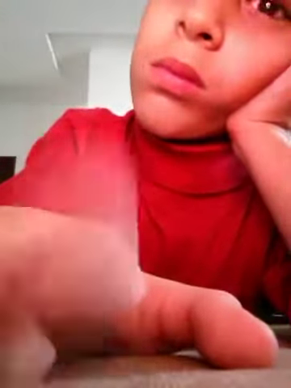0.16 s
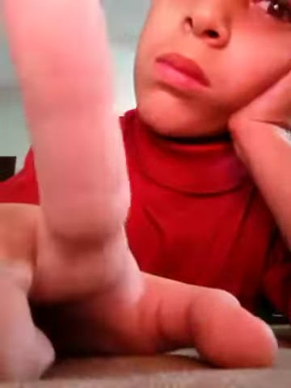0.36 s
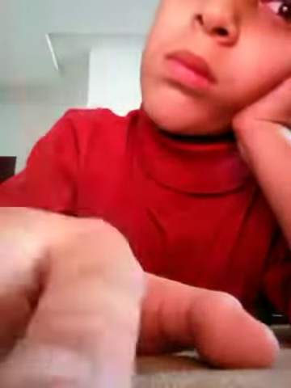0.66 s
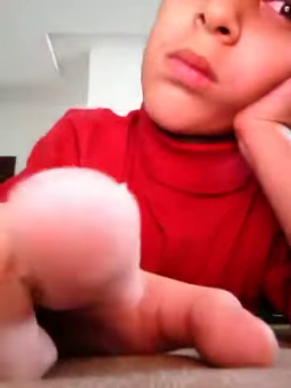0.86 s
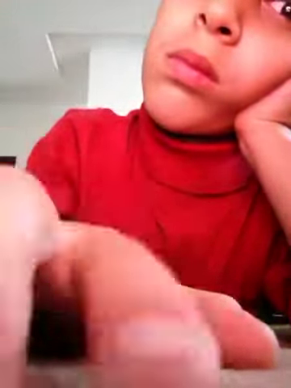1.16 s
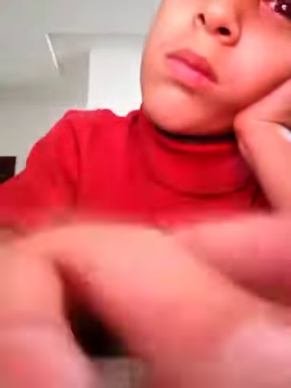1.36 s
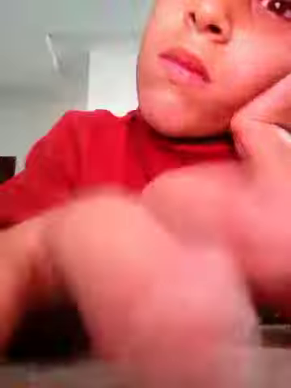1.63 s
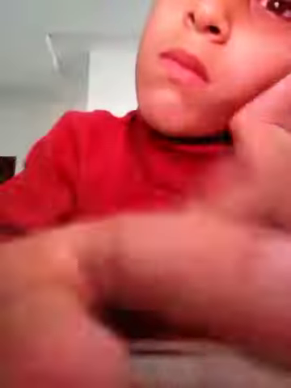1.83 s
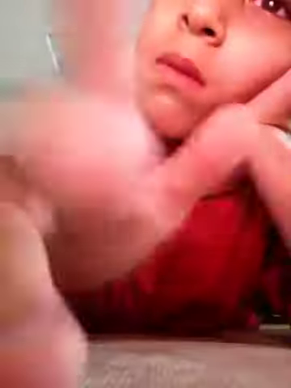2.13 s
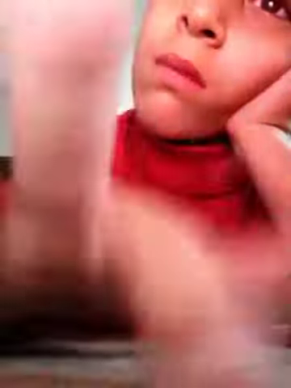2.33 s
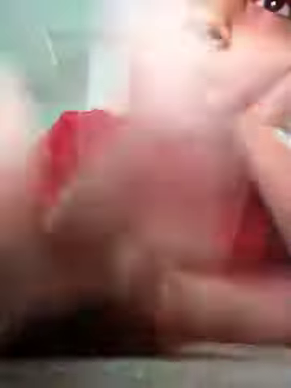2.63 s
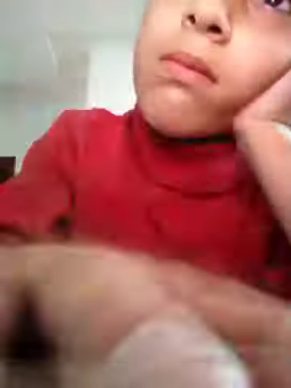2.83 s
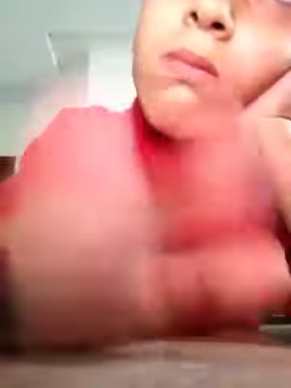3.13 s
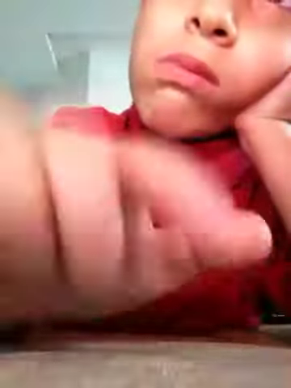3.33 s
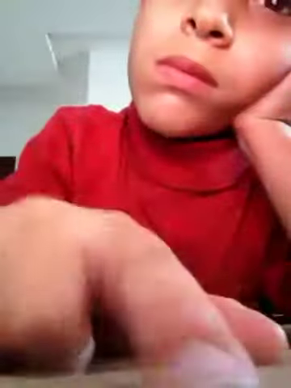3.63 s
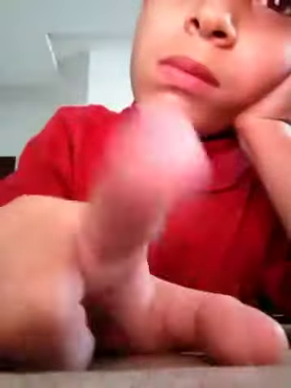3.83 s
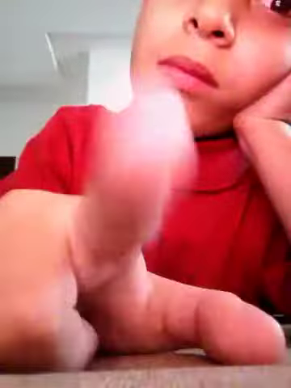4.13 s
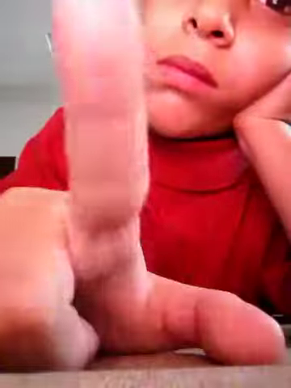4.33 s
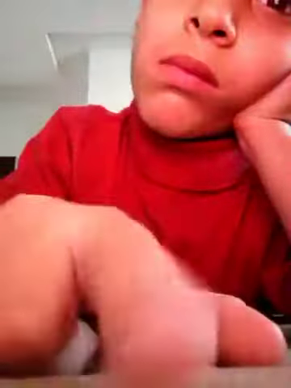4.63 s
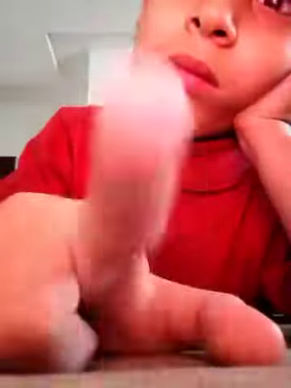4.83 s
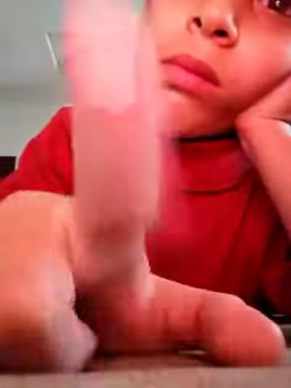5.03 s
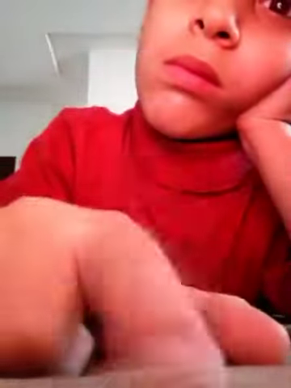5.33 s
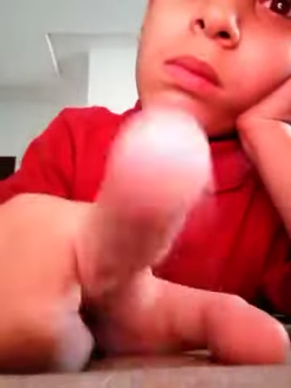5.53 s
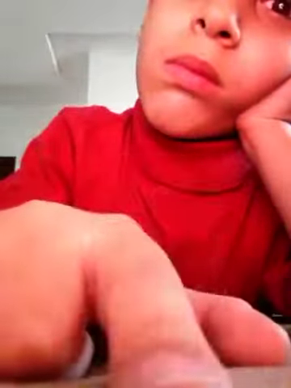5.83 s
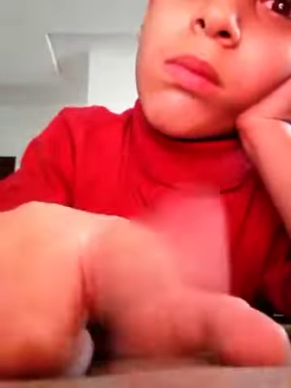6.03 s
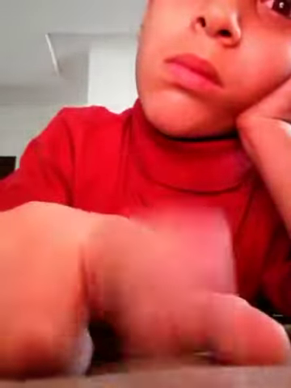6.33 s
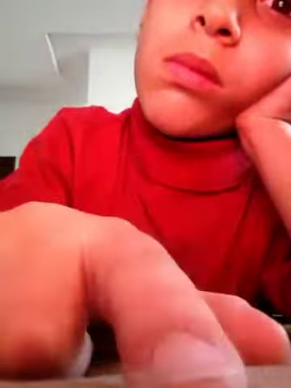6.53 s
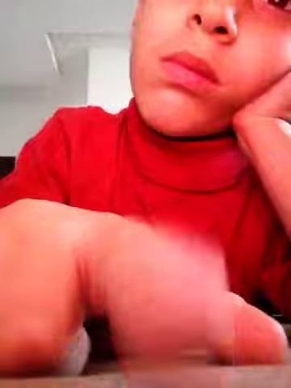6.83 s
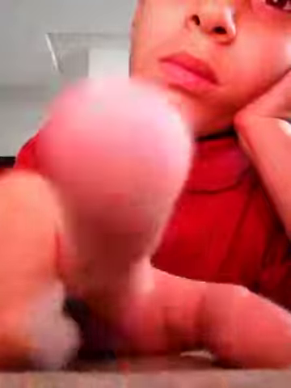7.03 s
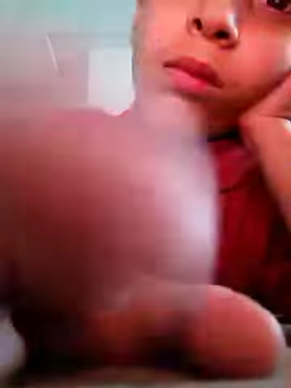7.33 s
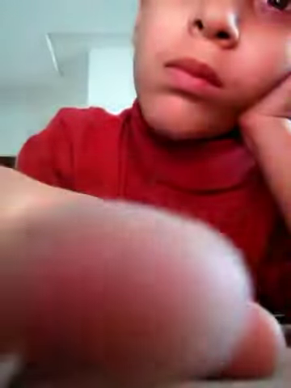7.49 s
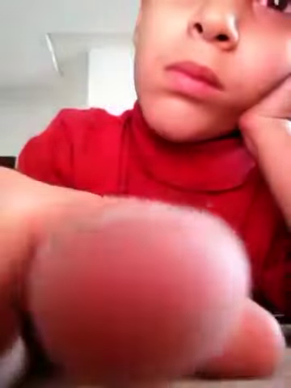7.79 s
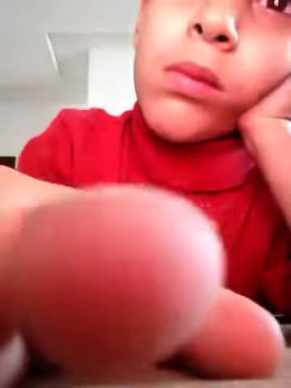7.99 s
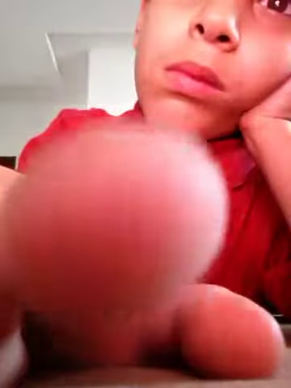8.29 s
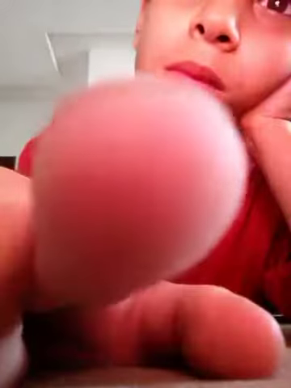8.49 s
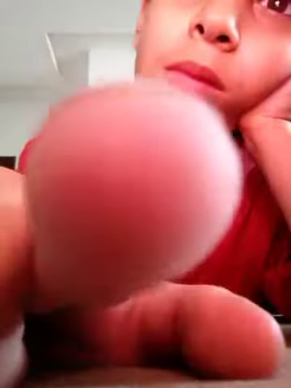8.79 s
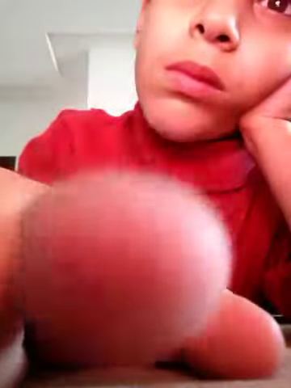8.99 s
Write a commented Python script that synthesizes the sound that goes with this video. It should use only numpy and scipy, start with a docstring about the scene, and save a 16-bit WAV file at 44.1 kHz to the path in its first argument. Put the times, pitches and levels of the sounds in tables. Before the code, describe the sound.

Close, dull finger taps thump a damped board in uneven runs, with small scuffs and a short sliding swish, then near silence.

```python
"""A quiet room with microphone hiss and a faint hum; then fingertips tap and drum on a tabletop beside a phone.
Each tap is a light touch with a skin tick, then milliseconds later the pad's weight thumps the damped board.
A faint ring follows, and dull pushes and short scuffs fill the gaps as the hand rocks and skin brushes the top.
The hand slides across the top about one second in, and again near seven seconds: swish, scrape and groan.
From about two seconds a nail catches now and then, a tiny snap of bright noise."""
import sys
import numpy as np
from scipy import signal
from scipy.fft import rfft, irfft
from scipy.io import wavfile
from scipy.ndimage import uniform_filter1d

SR = 44100
rng = np.random.default_rng(int(sys.argv[2]) if len(sys.argv) > 2 else 0)


def to_wav(s):
    """Save 16-bit WAV."""
    ch = np.atleast_2d(s).T  # columns
    pcm = np.round(np.clip(ch, -1, 1) * 32767)  # PCM
    wavfile.write(sys.argv[1], SR, pcm.astype(np.int16))


N = 403515
TIME = np.arange(N) / SR
SIZE = 8192  # samples in each short sound
AGE = np.arange(SIZE) / SR  # seconds since a short sound began
HZ = np.maximum(np.fft.rfftfreq(SIZE, 1 / SR), 1e-3)
LEAD = 512 / SR  # seconds of fade-in ahead of each blow


def undb(db):
    """Decibels to gain."""
    return 10 ** (np.asarray(db) / 20)


def unit(x):
    """Scale to rms 1."""
    return x / np.sqrt(np.mean(x ** 2))


def held(wave, seconds):
    """Scale a short sound so that its energy is that of rms 1 for so many seconds."""
    return wave * np.sqrt(seconds * SR / np.sum(wave ** 2))


def add(track, at, wave):
    """Mix a wave into the track at a time in seconds."""
    start = max(int(round(at * SR)), 0)
    part = wave[:max(N - start, 0)]
    track[start:start + len(part)] += part


def band(x, lo_hz, hi_hz, order=2):
    """Band-pass filter."""
    top_hz = min(hi_hz, SR / 2 - 10)
    return signal.sosfilt(signal.butter(order, [lo_hz, top_hz], "band", fs=SR, output="sos"), x)


def noise(colour):
    """Noise of rms 1 whose spectrum follows the (hz, level_db) points of a table."""
    hz, level_db = np.transpose(colour)
    bins = np.maximum(np.fft.rfftfreq(N, 1 / SR), 1)
    gain = undb(np.interp(np.log(bins), np.log(hz), level_db))
    return unit(irfft(rfft(rng.standard_normal(N)) * gain, N))


# Spectrum of the still air and hiss.
# Columns: pitch_hz [Hz], level_db [dB, relative]
ROOM_COLOUR = [(18, -63.5), (30, -34), (111, -7.5), (137, -8), (173, -5), (292, -10), (350, -10),
               (379, -14.5), (591, -18), (767, -18.5), (1080, -19.5), (1590, -21.5), (13600, -23),
               (15500, -25)]
ROOM_DB = -65  # rms
HUM_HZ, HUM_DB = 110, -79.5  # pitch, rms


def room():
    """Still air and microphone hiss are coloured noise; a faint appliance hum is one steady sine."""
    air = undb(ROOM_DB) * noise(ROOM_COLOUR)
    hum = undb(HUM_DB) * unit(np.sin(2 * np.pi * HUM_HZ * TIME))
    return air + hum


def mode(hz, width_hz):
    """Response of one damped resonance."""
    return 1 / (1 + 1j * (HZ ** 2 - hz ** 2) / (HZ * width_hz))


def soften(hz):
    """Response of a yielding contact: treble falls 6 dB an octave above hz."""
    return 1 / (1 + 1j * HZ / hz)


def blow(response, lowest_hz=80):
    """Brief wave of a response, peak 1, starting LEAD seconds in; the small board radiates no deep bass."""
    radiated = 1 / np.sqrt(1 + (lowest_hz / HZ) ** 8)
    wave = irfft(response * radiated * np.exp(-2j * np.pi * HZ * LEAD))
    fade_in = np.sin(np.pi / 2 * np.minimum(AGE / LEAD, 1))
    fade_out = np.exp(-(AGE / .06) ** 4)
    wave = wave * fade_in * fade_out
    return wave / np.abs(wave).max()


def thump(pad_hz, hz=175, width_hz=113):
    """The soft pad pushes the board's lowest mode, which the hand damps within two swings."""
    return -blow(mode(hz, width_hz) * np.exp(-(HZ / pad_hz) ** 2))


def rustle(spread_s, lo_hz, hi_hz):
    """Skin ridges rustle while the pad spreads or peels."""
    spread = AGE / spread_s
    swell = spread * np.exp(1 - spread)  # peaks at spread_s
    return unit(band(rng.standard_normal(SIZE), lo_hz, hi_hz, order=1)) * swell


# A finger lands.
# Columns: start_s [s, first touch], thump_db [dB peak], hardness [0 flat pad - 1 tip],
# lag_s [s, first touch to thump], pad_hz [Hz, fastest swing of the pad]
TAPS = [(.1052,-16,0.18,0.0047,279), (0.6113,-10.5,0.16,0.005,318), (1.179,-30.5,0.45,.005,390),
        (1.3809,-15,0.31,.0047,430), (1.5159,-28,.45,0.0072,210), (1.6171,-16.5,.05,.0056,192),
        (1.6299,-12.5,0.099,0.0042,475), (1.7493,-29,0.2,0.0069,246), (1.8374,-14.5,0.8,0.0024,200),
        (2.0079,-16.5,0.21,0.006,443), (2.1016,-10,.1,0.0045,182), (2.2864,-5.5,.9,0.0046,460),
        (2.4285,-13,0.64,0.0058,290), (2.6218,-14,0.71,0.0063,320), (2.8268,-20,0.11,.0049,348),
        (2.8368,-7,0.98,.0039,680), (2.8551,-17,0.12,0.0054,176), (2.9402,-38.5,1,0.0038,167),
        (3.0748,-12.5,.75,0.0042,534), (3.0873,-23,1,0.0053,168), (3.43,-29.5,0.15,0.00346,690),
        (3.676,-18.5,0.12,0.00706,353), (4.0109,-18.5,.2,.0067,318), (4.494,-14,0.82,.0062,360),
        (5.102,-12.5,0.97,0.0057,400), (5.3934,-18,0.87,.0062,352), (5.6246,-15,0.77,0.0062,403),
        (6.2393,-15.5,0.85,.0061,400), (6.534,-24.5,.75,0.0061,258), (9.122,-37,0.7,0.0041,180)]
# Upper modes of the board.
# Columns: pitch_hz [Hz, before random detuning], width_hz [Hz], level_db [dB, relative]
BOARD = [(320, 69, 3.5), (630, 250, -4.5), (683, 68, -2), (1320, 210, -6.5), (1886, 450, -17)]
USUAL_DB = -17  # thump of an ordinary tap
LIGHTNESS = 0.25  # dB that the first touch gains on the thump for each dB that a tap is lighter
# parts of the first touch in an ordinary tap: (dB re thump with a flat pad, dB gained with the tip)
TOUCH_DB, KNOCK_DB, TICK_DB = (-2, -5.5), (-31, 20.5), (-47, 24.5)
# fastest swing of the first touch with a flat pad; its rise with the tip
EDGE_HZ, EDGE_OCTAVES = 2880, .6


def touch_gain(part_db, hardness, force_db):
    """Gain of one part of the first touch re the thump; it follows hardness and lightness."""
    flat_db, tip_db = part_db
    return undb(flat_db + tip_db * hardness - LIGHTNESS * force_db)


def board_knock(edge):
    """A touch excites the upper modes, whose pitches vary a little at random from tap to tap."""
    detuning = np.exp(.06 * rng.standard_normal(len(BOARD)))
    modes = 0
    for k, (hz, width_hz, level_db) in enumerate(BOARD):
        sign = (-1) ** k  # alternating signs spread the knock out, so it is less spiky
        modes = modes + sign * undb(level_db) * mode(hz * detuning[k], width_hz)
    return -held(blow(modes * soften(1600) * edge), 0.0017)


def skin_tick(edge):
    """The skin's first contact ticks: one broad, heavily damped resonance."""
    return -held(blow(mode(1900, 2000) * soften(1500) * edge), 0.0035)


def taps():
    """First touch with a skin tick and the upper modes, then the thump as the pad flattens."""
    out = np.zeros(N)
    touch = mode(194, 215) * (1 - soften(200)) * soften(300)
    for at, db, hardness, lag, pad_hz in TAPS:
        force_db = db - USUAL_DB
        # the contact takes a finite time, which bounds its treble
        edge_hz = EDGE_HZ * 2 ** (EDGE_OCTAVES * hardness)
        edge = 1 / (1 + (HZ / edge_hz) ** 4)
        first_touch = touch_gain(TICK_DB, hardness, force_db) * skin_tick(edge)
        first_touch += touch_gain(KNOCK_DB, hardness, force_db) * board_knock(edge)
        first_touch -= touch_gain(TOUCH_DB, hardness, force_db) * blow(touch * edge)
        add(out, at - LEAD, undb(db) * first_touch)
        add(out, at + lag - LEAD, undb(db) * thump(pad_hz))
        add(out, at, undb(db - 43.5) * rustle(spread_s=0.0033, lo_hz=3020, hi_hz=15200))
        add(out, at, undb(db - 37.5) * rustle(spread_s=0.0024, lo_hz=600.8, hi_hz=1720))
    return out


# After-ring of the table frame and the room.
# Columns: from_hz [Hz], to_hz [Hz], level_db [dB gain in the band], t60_s [s, to fall 60 dB]
RINGS = [(110.9, 370, -25.5, 0.058), (100, 420, -33, 0.92), (458, 5000, -21, 0.091)]


def after_ring(x):
    """The table frame and the room ring on faintly: decaying noise bands, cut off after SIZE samples."""
    swell = 1 - np.exp(-(AGE / 0.011) ** 2)
    tail = np.zeros(SIZE)
    for lo_hz, hi_hz, level_db, t60_s in RINGS:
        decay = undb(-60 * AGE / t60_s)
        ring = band(rng.standard_normal(SIZE), lo_hz, hi_hz) * swell * decay
        tail += undb(level_db) * held(ring, 2 * (hi_hz - lo_hz) / SR ** 2)
    return signal.fftconvolve(x, tail)[:N]


# The hand rocks on the board, a finger lifts off, or a neighbouring finger lands just ahead of a tap. Columns:
# start_s [s], level_db [dB peak]
BUMPS = [(0.152,-40), (0.769,-45), (1.1403,-31.5), (1.2449,-38), (1.264,-42.5), (1.373,-29), (1.4135,-38),
         (1.4747,-31), (1.536,-34), (1.609,-23.5), (1.83,-25.5), (1.8398,-12.5), (2.042,-38), (2.122,-28),
         (2.133,-28), (2.3473,-38), (2.616,-29), (2.6858,-43), (3.146,-36), (3.455,-32), (3.786,-40.5),
         (4.1245,-43), (5.129,-37), (6.0366,-37), (6.7987,-43)]
BUMP_HZ = 393  # fastest swing of the pad in a push as strong as an ordinary tap
BUMP_DB_PER_OCTAVE = 35  # lighter pushes are duller
SETTLE_S, SETTLE_DB, SETTLE_HZ = 0.027, -33, 295  # delay after first touch, dB re thump, fastest swing


def bumps():
    """Dull pushes with a trace of skin noise as the hand rocks, a finger lifts off or a neighbouring finger
    lands; a fainter push as it settles after each tap."""
    out = np.zeros(N)
    for at, db, *_ in TAPS:
        add(out, at + SETTLE_S - LEAD, undb(db + SETTLE_DB) * thump(SETTLE_HZ))
    for at, db in BUMPS:
        pad_hz = BUMP_HZ * 2 ** ((db - USUAL_DB) / BUMP_DB_PER_OCTAVE)
        add(out, at - LEAD, undb(db) * thump(pad_hz))
        add(out, at - .008, undb(-64) * rustle(spread_s=0.0045, lo_hz=349, hi_hz=3000))
    return out


def grip(rough_db, size=130):
    """Skin sticks and slips: a level that flutters every few milliseconds."""
    flutter = unit(uniform_filter1d(rng.standard_normal(N), size))
    return unit(undb(rough_db * flutter))


# Skin brushes the top.
# Columns: start_s [s], end_s [s], rasp_db [dB rms before the fades], pressure [0-1]
SCUFFS = [(0.146, 0.168, -65.5, .6), (0.425, 0.509, -69, 0.26), (1.225, 1.26, -58.5, 0.47),
          (1.367, 1.428, -65.5, 0.6), (1.453, 1.487, -63, .7), (1.475, 1.706, -59.5, 0.14),
          (1.776, 1.813, -53, 0), (1.886, 2.126, -68, 0.54), (2.093, 2.195, -57.5, 0.93),
          (2.322, 2.38, -53.5, 0.02), (2.627, 2.677, -56, 0.56), (2.85, 2.98, -66, 0),
          (3.052, 3.187, -67, .75), (3.427, 3.471, -49.5, 0.25), (3.478, 3.503, -59, 0.23),
          (3.562, 3.634, -61, 0.17), (3.831, 3.875, -63.5, 0.08), (3.952, 4.053, -62.5, 0.12),
          (4.109, 4.115, -61.5, 0), (4.233, 4.28, -67, 0), (4.668, 4.689, -66.5, 0),
          (4.907, 5, -65.5, 0.15), (5.056, 5.128, -64, 0.2), (6.02, 6.037, -62.5, 0.25),
          (7.328, 7.664, -80, 0.36)]
BODY_DB, FIZZ_DB = (-.5, 14), (-13, 15)  # (dB re rasp in a light rub, dB gained at full pressure)


def scuffs():
    """Short rubs rasp at the contact; pressure adds a body from the board and a fizz from the skin ridges."""
    out = np.zeros(N)
    flutter = grip(rough_db=2.5)
    body = unit(band(rng.standard_normal(N), 180, 820))
    rasp = unit(band(rng.standard_normal(N), 1000, 5300))
    fizz = unit(band(rng.standard_normal(N), 6800, 13000))
    for start, end, db, pressure in SCUFFS:
        body_gain, fizz_gain = (undb(light + pressed * pressure) for light, pressed in (BODY_DB, FIZZ_DB))
        span = slice(int((start - .006) * SR), int((end + 0.0074) * SR))  # room for the fades
        rub = rasp[span] + body_gain * body[span] + fizz_gain * fizz[span]
        out[span] += undb(db) * rub * signal.windows.tukey(len(rub), .7)
    return out * flutter


SLIDE_SHAPE = 1.5  # 1 = a pointed swell, 2 = a rounded one
SLIP_HZ, SLIP_POWER = 331.5, .35  # mean stick-slip rate at full speed; it follows the speed to this power


def stroke(at, rise_s, fall_s):
    """Speed of a sliding hand, 0-1: it gathers pace, then brakes."""
    ramp_s = np.where(TIME < at, rise_s, fall_s)
    return np.exp(-(np.abs(TIME - at) / ramp_s) ** SLIDE_SHAPE)


def judder(speed, wander=.14):
    """Uneven stick-slip cycles of the skin give a short, rough groan that rises with speed."""
    unevenness = unit(uniform_filter1d(rng.standard_normal(N), size=200))
    slip_hz = SLIP_HZ * speed ** SLIP_POWER * (1 + wander * unevenness)
    phase = 2 * np.pi * np.cumsum(slip_hz) / SR
    cycles = unit(np.sin(phase) + undb(-9) * np.sin(2 * phase))
    return speed ** 1.7 * cycles * grip(rough_db=1.0)


# Long slides of the hand.
# Columns: fastest_s [s], swish_db [dB at full speed], rise_s [s], fall_s [s],
# groan_db [dB re swish, stick-slip]
SLIDES = [(1.062, -50.5, .065, .066, -1.5), (7.085, -48.5, .1, 0.083, -26)]
# Spectrum of the swish.
# Columns: pitch_hz [Hz], level_db [dB, relative]
SLIDE_COLOUR = [(47, -64), (80, -46), (114, -9), (205, 2), (371, -2.5), (404, -1.5), (526, -9), (574, -12),
                (1160, -10.5), (4030, -15.5), (12900, -32.5), (15000, -38)]


def slides():
    """The hand glides over the top: a swish and a scrape that follow its speed, with a stick-slip groan."""
    swish = noise(SLIDE_COLOUR) * grip(rough_db=1.06)
    scrape = undb(-7.5) * unit(band(rng.standard_normal(N), 250, 910)) * grip(rough_db=1.5)
    out = np.zeros(N)
    for at, db, rise_s, fall_s, groan_db in SLIDES:
        speed = stroke(at, rise_s, fall_s)
        groan = undb(groan_db) * judder(speed)
        out += undb(db) * (speed * (swish + scrape) + groan)
    return out


# A nail catches.
# Columns: start_s [s], level_db [dB peak]
NAILS = [(2.209, -47.5), (2.939, -34), (3.1114, -32.5), (3.14, -44), (5.708, -34.5), (7.1283, -44)]


def nails():
    """A catching nail gives a tiny bright snap: noise that dies within a few milliseconds."""
    out = np.zeros(N)
    for at, db in NAILS:
        burst = rng.standard_normal(SIZE) * np.exp(-AGE / 0.00065)
        snap = band(burst, 4500, 19000, order=1)
        add(out, at, undb(db) * snap / np.abs(snap).max())
    return out


def scene():
    """The hand on the table, with its after-ring, over a still room."""
    hand = taps() + bumps() + scuffs() + slides() + nails()
    return (room() + hand + after_ring(hand))[None]


TOP_HZ = 15400


def record(dry):
    """The phone cuts the top: a steep low-pass at TOP_HZ."""
    return signal.sosfilt(signal.ellip(10, .1, 70, TOP_HZ, fs=SR, output="sos"), dry)


dry = scene()
out = record(dry)
to_wav(out)
```